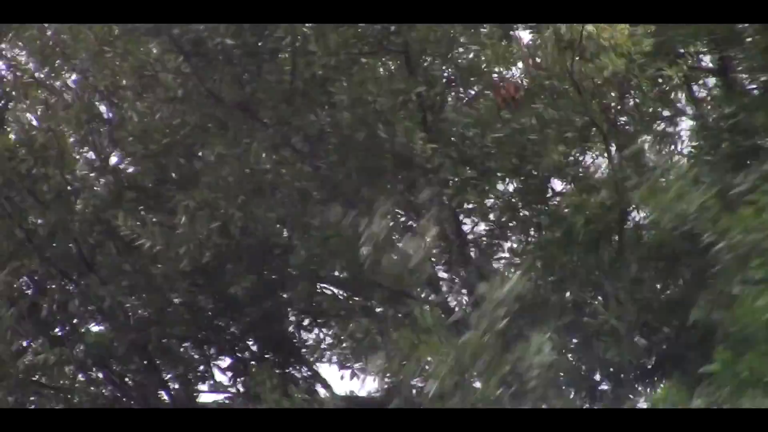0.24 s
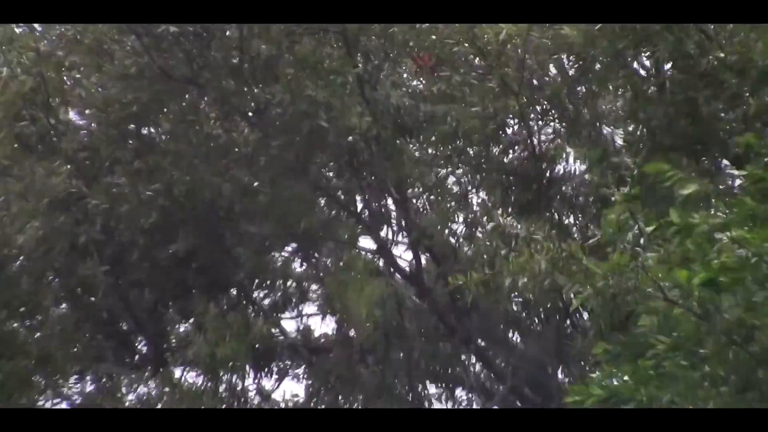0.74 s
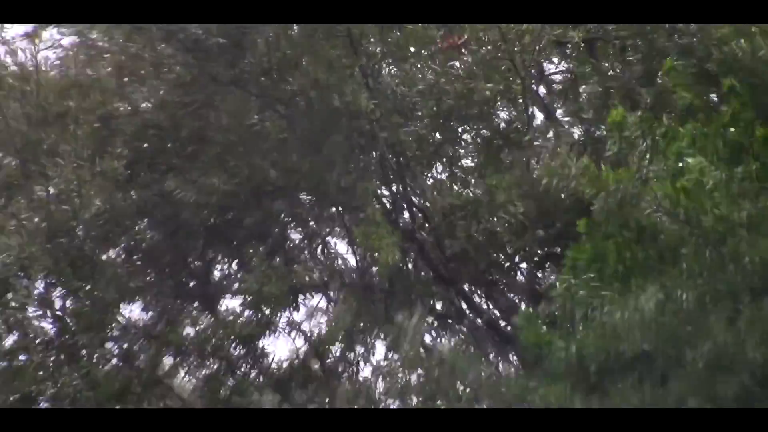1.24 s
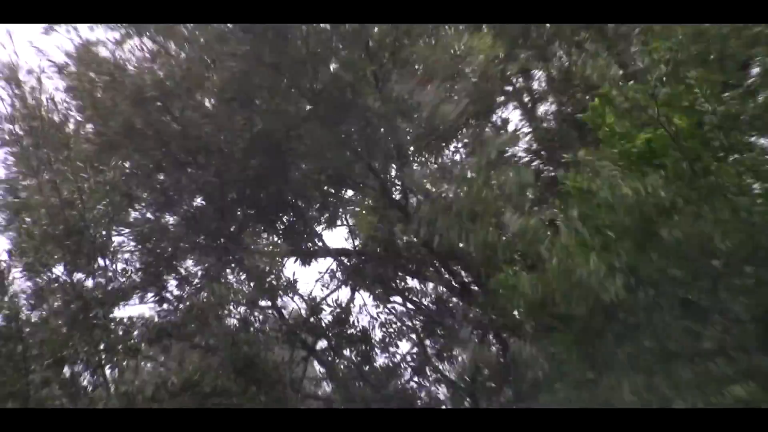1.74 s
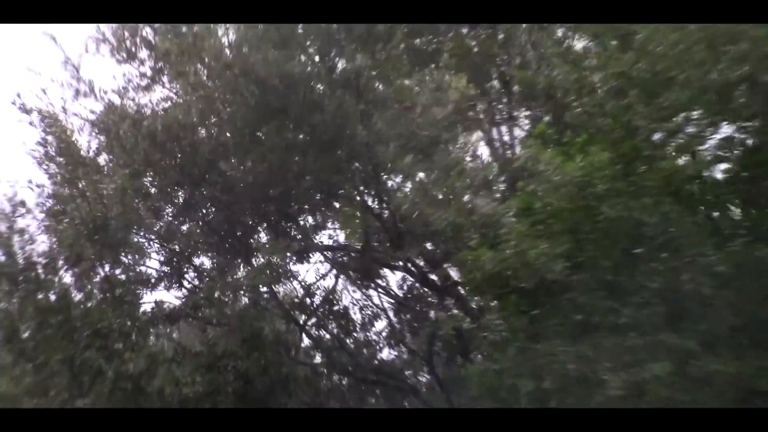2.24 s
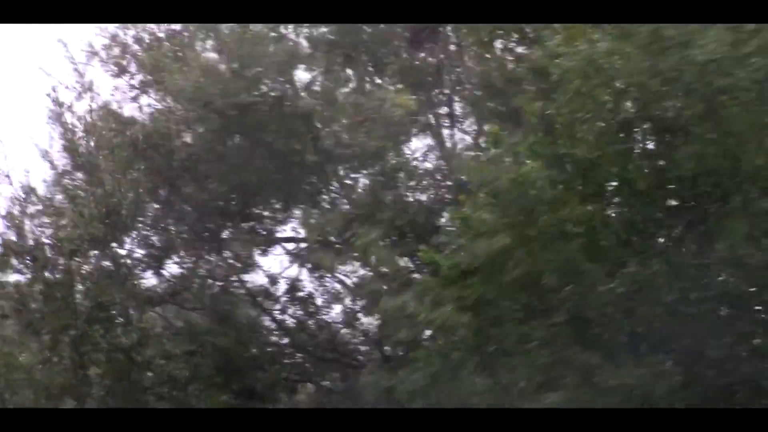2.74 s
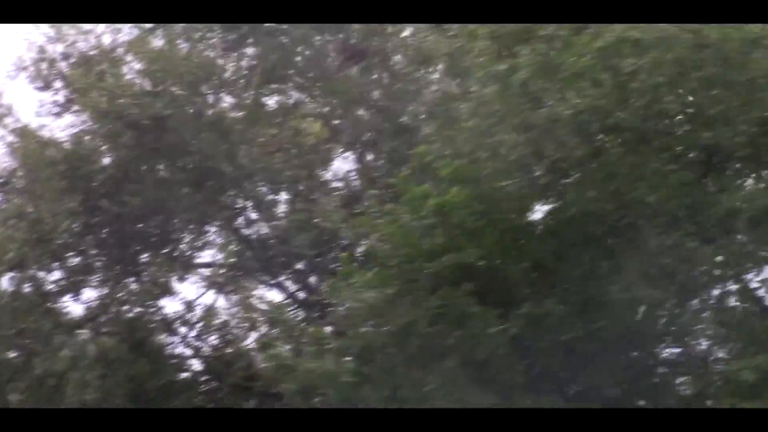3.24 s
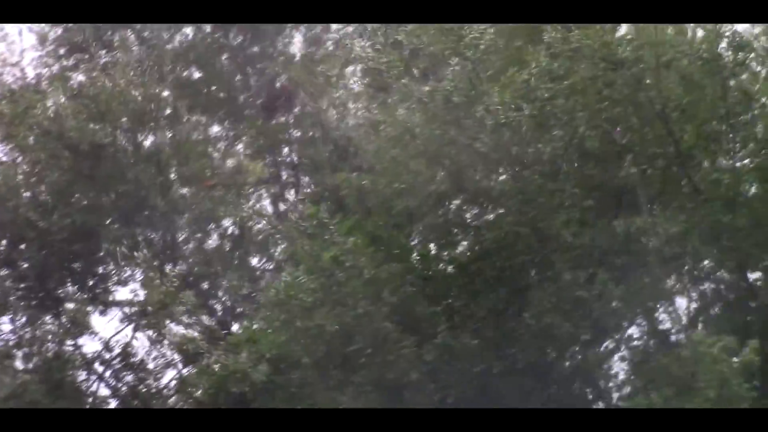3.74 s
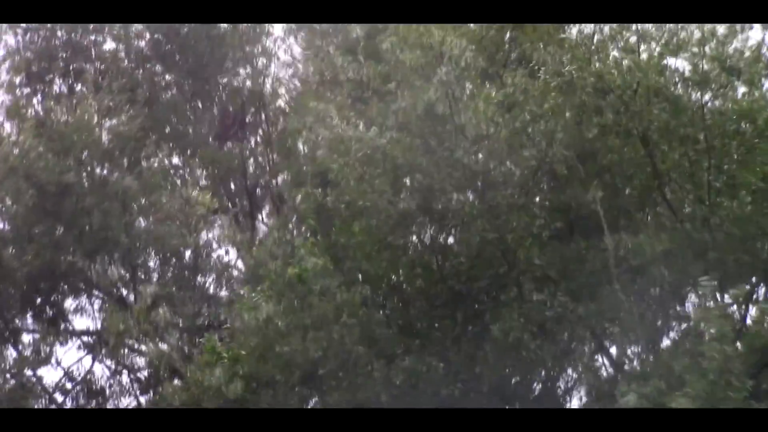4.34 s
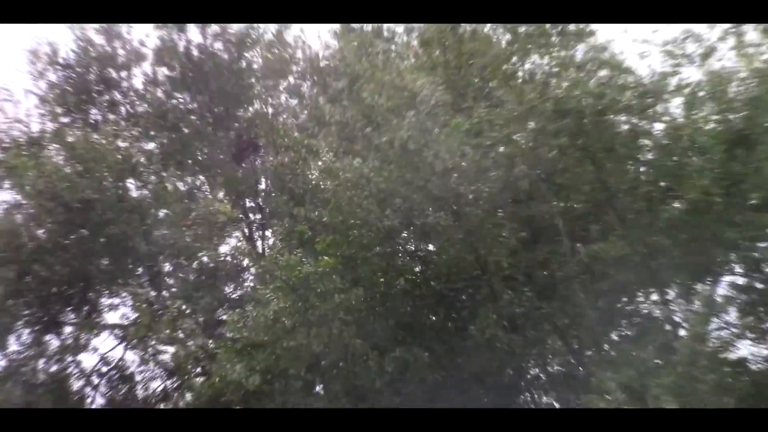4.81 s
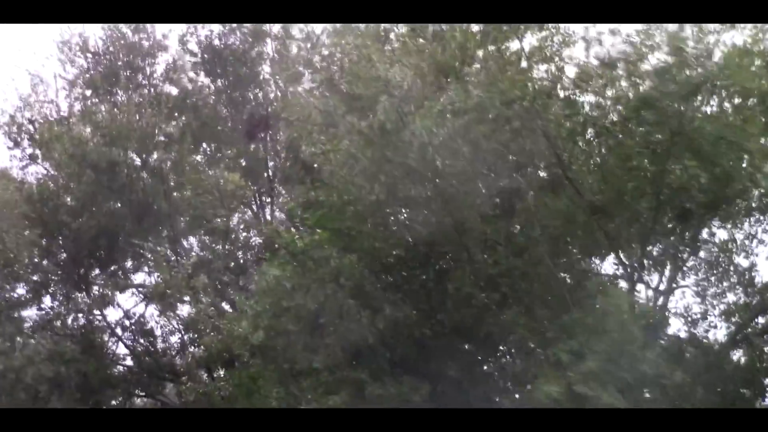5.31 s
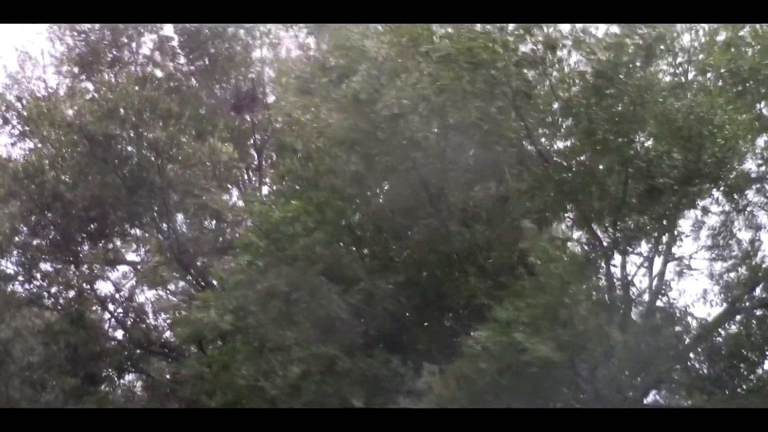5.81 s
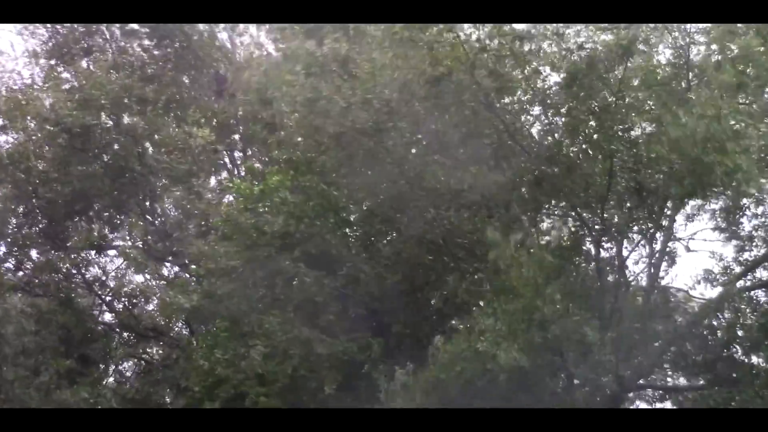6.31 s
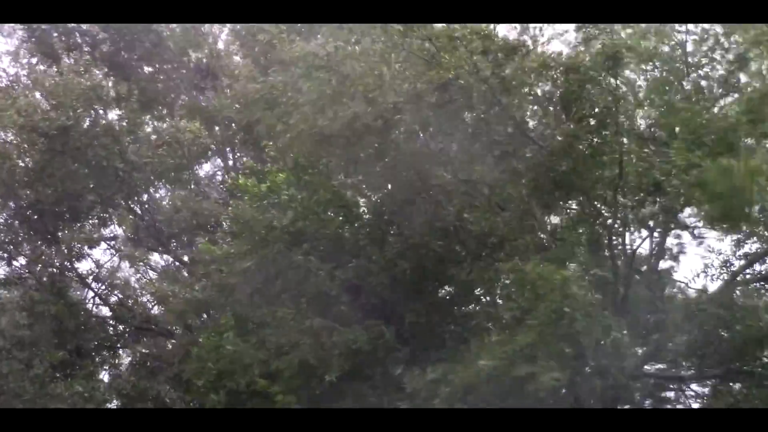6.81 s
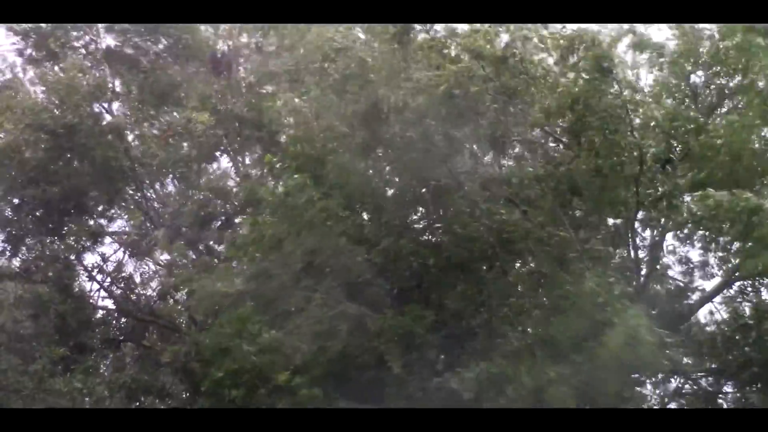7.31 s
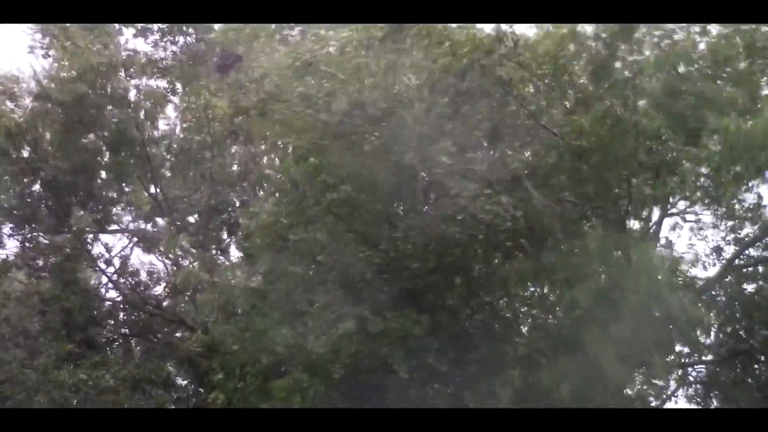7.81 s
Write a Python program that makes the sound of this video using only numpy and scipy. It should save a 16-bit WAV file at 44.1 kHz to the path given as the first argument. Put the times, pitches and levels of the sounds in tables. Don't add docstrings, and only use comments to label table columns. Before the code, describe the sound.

Outdoors beside leafy trees in a storm wind, heard through a small unprotected camera microphone. A broad low roar and nearer leaf hiss run throughout, with a few soft low bumps at the very start. After about three and a half seconds gusts strike the microphone with dense, irregular, booming thumps; the tree sound ducks under each blow and climbs back. Nearly mono, dry, still battering at the end.

```python
import sys
import numpy as np
from scipy import signal
from scipy.fft import rfft, irfft, next_fast_len
from scipy.io import wavfile
from scipy.ndimage import uniform_filter1d

SR = 44100
rng = np.random.default_rng(int(sys.argv[2]) if len(sys.argv) > 2 else 0)


def invert_db(x):
    u = np.asarray(x, float) / 20
    return 10 ** u


def file_out(sig):
    cols = np.atleast_2d(sig).T
    lim = np.clip(cols, -1, 1)
    pcm = np.round(lim * 32767).astype(np.int16)
    wavfile.write(sys.argv[1], SR, pcm)


N = 355446

# time_s [s], strength_db [dB]
CROWN_WIND = [
    (0, 0.5),
    (1.2, 1),
    (2.4, -1.5),
    (3.6, -1),
    (4.5, -0.5),
    (5.05, 1),
    (5.5, -1.5),
    (6.5, 1),
    (7.3, -1.5),
    (8.06, -1.5),
]
# frequency_hz [Hz], density_db [dB per Hz]
ROAR_SPECTRUM = [(20, -26), (40, -45), (70, -8), (100, 1.5), (160, -2.5), (300, -5.5), (500, -6),
                 (900, -10.5), (1500, -17), (2500, -23), (5000, -35), (12000, -90)]
# frequency_hz [Hz], density_db [dB per Hz]
LEAF_SPECTRUM = [(500, -6.5), (800, -8), (1200, -4), (2400, -4.5), (3800, -4), (5600, -1.5), (7000, -7.5),
                 (9000, -14), (11500, -20), (13500, -30), (14500, -60)]
# frequency_hz [Hz], density_db [dB per Hz]
SPRAY_SPECTRUM = [(8000, -40), (11000, -3), (13000, 4), (14000, -1), (15000, -4), (15800, -10)]
# time_s [s], centre_hz [Hz]
FLICKER_BANDS = [(.036, 14700), (.126, 12500), (.524, 6260), (.523, 10700), (.567, 13200), (.71, 4680),
                 (1.589, 9000), (2.03, 4900), (2.033, 7550), (2.239, 7300), (2.751, 6560), (2.756, 10000),
                 (6.35, 5700), (6.349, 9700)]
# time_s [s], strength_db [dB]
PORT_WIND = [(0, -20), (.25, -16), (.5, -28), (2.5, -25.5), (3.5, -31), (3.64, -16), (4.3, -8), (4.8, -14),
             (4.97, -24), (5.12, -16), (5.25, -7), (5.8, -14), (6.2, -7), (6.45, -18.5), (6.7, -11.5),
             (7.2, -10.5), (7.6, -8), (8.06, -8.5)]
# frequency_hz [Hz], density_db [dB per Hz]
HEAVE_SPECTRUM = [(2, -22), (6, -4), (11, 6.5), (25, -2), (45, -13), (80, -13.5), (150, -63), (600, -120)]
# frequency_hz [Hz], density_db [dB per Hz]
FLUTTER_SPECTRUM = [(25, -26), (45, 3.5), (70, -3.5), (110, -10.5), (200, -19), (400, -65), (1500, -120)]
# peak_s [s], peak_db [dB], length_s [s]
FLUTTER_SPELLS = [(3.914, -12.5, .12), (4.4, -14, .07), (4.862, -20, 0.041), (5.35, -20, 0.25),
                  (5.625, -8, 0.039), (5.818, -13, 0.036), (5.963, -13, 0.029), (6.188, -11.5, 0.15),
                  (6.66, -27, 0.045), (6.884, -11, 0.086), (7.158, -11, 0.079), (7.38, -13, 0.092),
                  (7.554, -9, 0.058), (7.86, -25, 0.11), (8.06, -11, 0.088)]
# time_s [s], way [push 1, suck -1], length_ms [ms], share [of a full thump]
MILD_EDDIES = [(.055, 1, 36, 0.7), (.09, -1, 10, 0.25), (.115, 1, 11, 0.44), (.18, -1, 18, 0.57),
               (.215, 1, 33, 0.31), (.255, -1, 8, 0.3), (.275, 1, 14, 0.43), (.31, -1, 8.2, .5),
               (.335, 1, 16, 0.64), (.37, -1, 14, 0.67), (.54, -1, 14, 0.21), (3.892, -1, 8, 0.8),
               (4.158, -1, 7, 0.58), (4.265, 1, 7.8, 0.51), (4.868, -1, 18, .8), (5.232, 1, 30, 0.54),
               (5.283, -1, 15, 0.69), (5.354, 1, 10, 0.83), (5.559, 1, 15, .9), (5.616, -1, 4.2, .9),
               (5.985, -1, 4.2, .9), (6.08, 1, 9, .8), (6.168, 1, 9.5, 1.3), (6.212, -1, 5, 0.8),
               (6.91, -1, 14, .8), (6.963, 1, 7.8, 0.7), (6.977, -1, 4.2, 1.3), (7.088, -1, 18, 1),
               (7.313, 1, 15, 0.67), (7.435, -1, 10, 1.2)]
# time_s [s], over_db [dB over the ceiling], ease_ms [ms per 10 dB], way [push 1,
# suck -1]
GUST_EDDIES = [(3.655, 5, 35, -1), (3.728, 7.5, 40, 1), (3.767, 8.5, 56, -1), (3.843, 8.5, 29, 1),
               (3.921, 5.5, 62, 1), (3.964, 8, 53, -1), (4.012, 9.5, 46, 1), (4.077, 11, 23, -1),
               (4.109, 10.4, 50, -1), (4.145, 7.5, 50, 1), (4.173, 10.5, 45, 1), (4.233, 9.5, 37, -1),
               (4.325, 5.5, 45, 1), (4.379, 4, 36, -1), (4.44, 5, 60, -1), (4.494, 5, 48, 1),
               (4.526, 6.5, 37, 1), (4.569, 11, 32, -1), (4.622, 11.5, 52, 1), (4.675, 11, 98, -1),
               (4.734, 13, 27, 1), (4.844, 7, 167, 1), (4.899, 9, 58, -1), (4.94, 8, 52, 1),
               (5.204, 5.2, 67, -1), (5.257, 6.6, 80, 1), (5.309, 11, 90, 1), (5.336, 20, 42, -1),
                 (5.378, 18.2, 30, 1), (5.425, 14.4, 25.8, -1), (5.471, 10.8, 100, 1),
                 (5.525, 19.2, 38.4, -1), (5.636, 14.4, 38, 1), (5.661, 11.5, 40, -1),
                 (5.692, 11.7, 31, -1), (5.727, 13.3, 60, -1), (5.76, 13, 28, 1), (5.82, 4.3, 100, 1),
                 (5.946, 10, 57.3, -1), (6.007, 14.8, 60, 1), (6.042, 13.1, 64, -1), (6.121, 9.8, 161, 1),
                 (6.235, 12.3, 67, -1), (6.289, 14.8, 32, 1), (6.37, 4.4, 50, -1),
               (6.605, 9.4, 30, 1), (6.633, 7.7, 60, 1), (6.66, 10, 60, -1), (6.683, 18.3, 36, -1),
                 (6.724, 22.2, 28, 1), (6.773, 13, 50, -1), (6.813, 11, 30, 1), (6.875, 6.5, 60, 1),
                 (6.928, 7, 30, -1), (6.989, 9.7, 69, 1), (7.024, 10.5, 29, -1), (7.063, 16, 49.6, 1),
                 (7.129, 11.6, 30, 1), (7.17, 15, 90, -1), (7.193, 22.2, 40, -1), (7.243, 19.4, 33.8, 1),
                 (7.357, 11.3, 58, -1), (7.417, 5, 40, 1), (7.451, 8.9, 40, 1), (7.483, 7.3, 34, 1),
                 (7.527, 11, 40.4, -1), (7.604, 8.4, 40, -1), (7.677, 12.4, 50, 1), (7.718, 11.3, 28, -1),
                 (7.764, 7.3, 61.7, 1), (7.845, 8.5, 67, -1), (7.889, 14.8, 40, 1), (7.933, 13.6, 30, -1),
                 (7.969, 7.8, 55, 1), (8.055, 15, 160, -1)]
STRONG_EDDIES = GUST_EDDIES


def along(points, hz):
    f, v = np.transpose(points)
    return np.interp(np.log(hz + 1), np.log(f + 1), v)


def strength_curve(rows):
    time_s, strength_db = np.transpose(rows)
    return np.interp(np.arange(N) / SR, time_s, strength_db)


def unit(x):
    return x / np.sqrt(np.mean(x ** 2) + 1e-20)


def rush(spectrum, patchy_db):
    z = signal.stft(rng.standard_normal(N + 8192), nperseg=512)[2]
    patches = uniform_filter1d(rng.standard_normal(z.shape), size=6, axis=0)
    patches = uniform_filter1d(patches, size=12, axis=1)
    x = signal.istft(z * invert_db(patchy_db * unit(patches)), nperseg=512)[1]
    m = next_fast_len(len(x))
    colour = invert_db(along(spectrum, np.fft.rfftfreq(m, 1 / SR)))
    return unit(irfft(rfft(x, m) * colour, m)[:N])


def blow_db():
    build_ms = 10.4
    t, over = np.arange(N) / SR, np.zeros(N)
    for time_s, over_db, ease_ms, _ in STRONG_EDDIES:
        centre = round(time_s * SR)
        near = slice(max(centre - SR // 2, 0), centre + SR // 2)
        late_ms = (t[near] - time_s) * 1000
        fall_db = 10 * np.where(late_ms < 0, -late_ms / build_ms, late_ms / ease_ms)
        over[near] = np.maximum(over[near], over_db - fall_db)
    return uniform_filter1d(over, size=70)


def trees():
    strength_db = strength_curve(CROWN_WIND)
    roar_db = -18.5 + 0.23 * strength_db
    hiss_db = -23 + strength_db
    spray_db = hiss_db - 27 + 0.4 * strength_db - 0.02 * blow_db()
    roar = invert_db(roar_db) * rush(ROAR_SPECTRUM, patchy_db=0.45)
    leaves = invert_db(hiss_db) * rush(LEAF_SPECTRUM, patchy_db=0.28)
    spray = invert_db(spray_db) * rush(SPRAY_SPECTRUM, patchy_db=0.6)
    return roar + leaves + spray


def thumps(height, rise_s, lead_s):
    shove, t = np.zeros(N + SR), np.arange(-SR // 25, SR // 10) / SR
    times, *_, ways = np.transpose(STRONG_EDDIES)
    gaps_ms = np.diff(times, append=N / SR) * 1000
    lengths_ms = np.minimum(0.23 * gaps_ms, 16.5)
    full = [(time_s, way, ms, 1) for time_s, way, ms in zip(times, ways, lengths_ms)]
    for time_s, way, length_ms, share in MILD_EDDIES + full:
        width_s = np.where(t < 0, rise_s + length_ms / 4000, lead_s + length_ms / 1000)
        lobe = np.exp(-(t / width_s) ** 2)
        start = round((time_s - lead_s) * SR) - SR // 25
        shove[start:][:len(t)] += height * share * np.sign(way) * lobe
    return shove[:N]


def buffet(top, knee, sag_hz):
    port_db, over_db = strength_curve(PORT_WIND), blow_db()
    heave_db = 1 + port_db + 0.24 * uniform_filter1d(over_db, size=round(0.06 * SR))
    flutter_db = -22 + 0.32 * port_db
    t = np.arange(N) / SR
    spells = sum(invert_db(db) * np.exp(-((t - peak_s) / length_s) ** 2) for peak_s, db, length_s in FLUTTER_SPELLS)
    shove = thumps(height=0.77, rise_s=0.0029, lead_s=0.003)
    calm = 1 - 1.8 * np.clip(np.abs(shove), 0, 1)
    heave = calm * invert_db(heave_db) * rush(HEAVE_SPECTRUM, patchy_db=1.2)
    flutter = (invert_db(flutter_db) + spells) * rush(FLUTTER_SPECTRUM, patchy_db=-0.5)
    push = shove + heave + flutter
    swing = push / (1 + np.abs(push / top) ** knee) ** (1 / knee)
    swing = signal.lfilter(*signal.butter(1, sag_hz, "high", fs=SR), swing)
    return invert_db(over_db) * swing


def difference(x, bass_db):
    side = np.zeros(N)
    frame = np.hanning(2048) ** 0.5
    hz = np.fft.rfftfreq(len(frame), 1 / SR)
    for time_s, centre_hz in FLICKER_BANDS:
        db = -33.5 - 2.8 * abs(centre_hz - 6000) / 1000
        in_band = abs(hz - centre_hz) < 1300 / 2
        band = irfft(rfft(rng.standard_normal(len(frame))) * in_band)
        start = round(time_s * SR) - len(frame) // 2
        side[start:][:len(frame)] += invert_db(db) * unit(band) * frame
    level = np.sqrt(np.abs(uniform_filter1d(x[0] ** 2, size=4096)))
    bass_spectrum = [(4, -17), (10, 3), (60, -25), (90, -22), (200, -70), (400, -120)]  # Hz, dB per Hz
    return side + invert_db(bass_db) * level * rush(bass_spectrum, patchy_db=-1.5)


def scene():
    return np.tile(trees() + buffet(top=0.85, knee=3.2, sag_hz=2.9), (2, 1))


def low_pass(x):
    return signal.sosfilt(signal.butter(12, 15710, fs=SR, output="sos"), x)


def record(dry):
    x = dry * invert_db(-blow_db())
    x = x / (1 + np.abs(x / 0.94) ** 16) ** (1 / 16)
    x = x + difference(x, bass_db=-32) * [[1], [-1]]
    return low_pass(x)


dry = scene()
out = record(dry)
file_out(out)
```